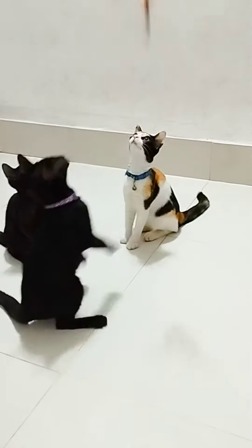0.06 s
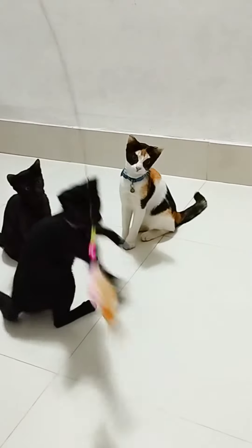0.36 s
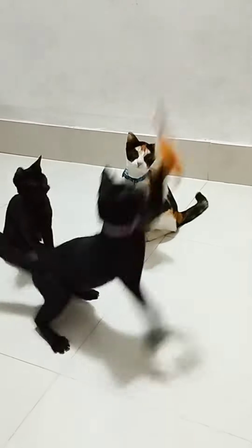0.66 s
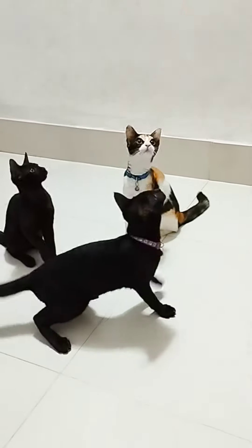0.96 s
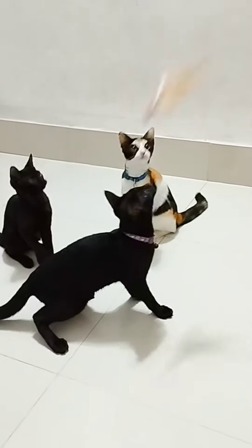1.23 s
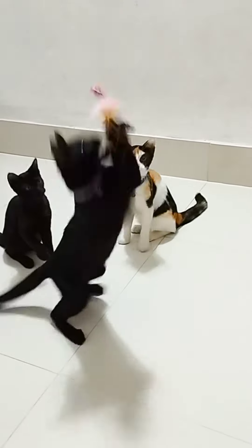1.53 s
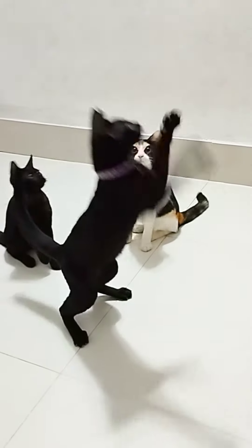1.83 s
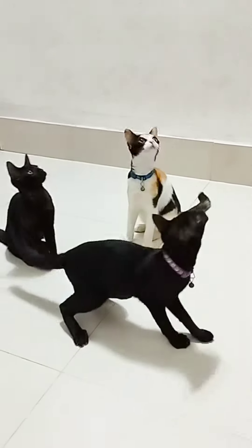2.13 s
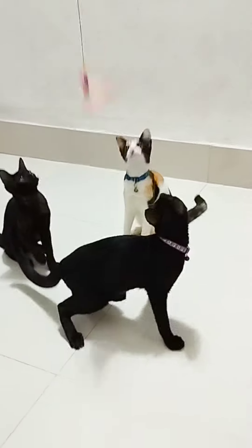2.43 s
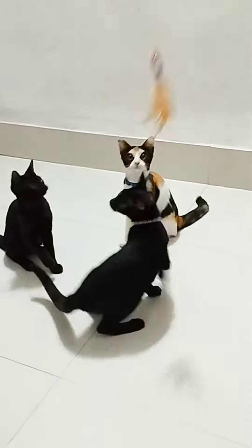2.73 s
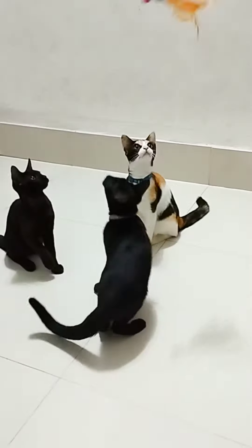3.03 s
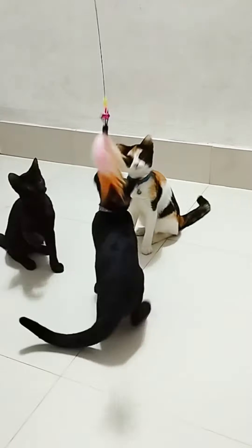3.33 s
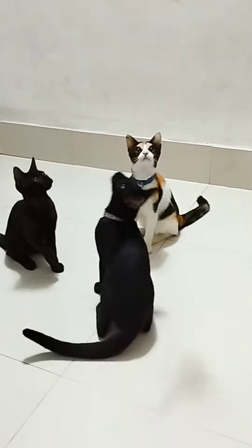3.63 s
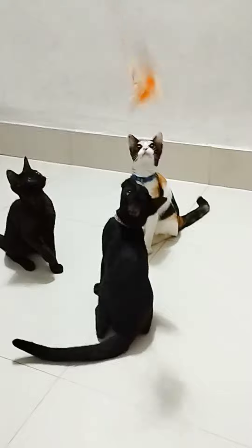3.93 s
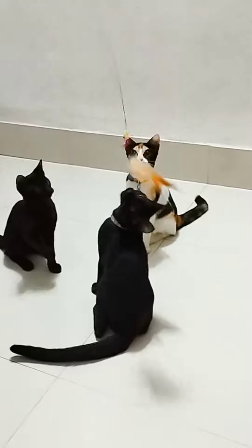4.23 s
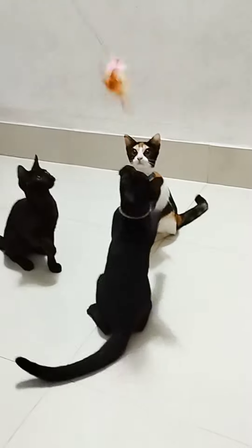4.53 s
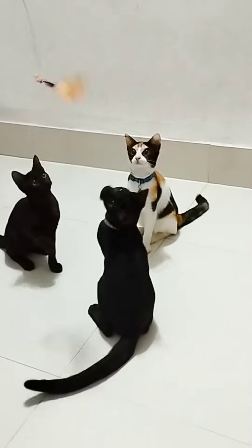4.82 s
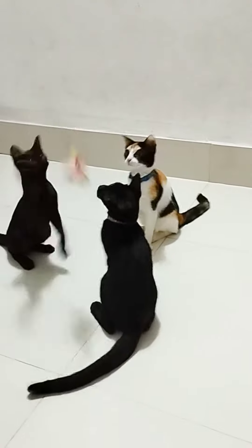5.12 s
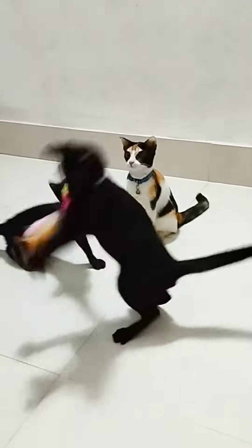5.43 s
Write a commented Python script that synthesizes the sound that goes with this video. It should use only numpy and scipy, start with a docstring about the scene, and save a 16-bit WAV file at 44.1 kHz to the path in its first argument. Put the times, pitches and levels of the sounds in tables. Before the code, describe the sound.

A jerked cat toy's tiny bells clash and rattle indoors, while a collar bell tinkles, paws land softly and a fan hums.

```python
"""Cats chasing a toy with bells

Cats leap and swat at a feather toy on a string in a bare tiled room. The toy's small
bells clash at each jerk and rattle in between; a higher, purer bell tinkles on one cat's
collar. Soft paws thud on the floor. Behind it all a fan hums and stirred air rumbles faintly."""
import sys
import numpy as np
from scipy import signal
from scipy.fft import rfft, irfft, next_fast_len
from scipy.io import wavfile

SR = 44100
rng = np.random.default_rng(int(sys.argv[2]) if len(sys.argv) > 2 else 0)


def transcribe(u):
    """Save the signal u as a 16-bit wav file named by the first command-line argument.

    u: samples, shape (n,) or (channels, n), limited to [-1, 1]; the rate is SR.
    q: integer samples, one column per channel.
    """
    v = np.clip(np.atleast_2d(u).T, -1, 1)
    q = np.round(v * 32767).astype(np.int16)
    wavfile.write(sys.argv[1], SR, q)


N = 249606
TIME = np.arange(N) / SR


def from_db(db):
    """Turns decibels into a gain: -6 dB is about half."""
    return 10 ** (np.asarray(db) / 20)


def rms_one(x):
    """Scales a signal to an average power of 1."""
    return x / np.sqrt(np.mean(x ** 2) + 1e-20)


def at_hz(points, hz):
    """Reads a (frequency, value) curve, with every octave equally wide."""
    known_hz, values = np.transpose(points)
    return np.interp(np.log(hz), np.log(known_hz), values)


def at_time(points, when):
    """Reads a (time, value) curve at the given times."""
    return np.interp(when, *np.transpose(points))


def drift(rate, step=100):
    """A smooth random wobble of size about 1; a higher rate makes it quicker."""
    pole = np.exp(-2 * np.pi * step * rate / SR)
    noise = rng.standard_normal(N // step + 1002)
    slow = signal.lfilter([1], [1, -2 * pole, pole * pole], noise)[1000:]   # skip the settling
    return np.interp(np.arange(N) / step, np.arange(len(slow)), rms_one(slow))


def band(x, low_hz, high_hz):
    """Keeps the sound between two frequencies."""
    return signal.sosfilt(signal.butter(2, [low_hz, high_hz], "band", fs=SR, output="sos"), x)


def coloured(x, spectrum):
    """Boosts or cuts each frequency by a (frequency [Hz], gain [dB]) curve."""
    size = next_fast_len(N)
    hz = np.maximum(np.fft.rfftfreq(size, 1 / SR), 1)
    return irfft(rfft(x, size) * from_db(at_hz(spectrum, hz)), size)[..., :N]


def panned(pan_db):
    """Left and right gains; pan is how much louder the left side is."""
    return from_db(np.array([pan_db, -pan_db]) / 2)


def ring(when, strengths, hz, t60):
    """Blows set one tone ringing; t60, the ring time, is the seconds it takes to fade by 60 dB."""
    clicks = np.full((2, N), 1e-18)
    clicks[:, np.clip((when * SR).astype(int), 0, N - 1)] = strengths
    decay, angle = from_db(-60 / (t60 * SR)), 2 * np.pi * hz / SR
    return signal.lfilter([0, np.sin(angle)], [1, -2 * decay * np.cos(angle), decay ** 2], clicks)


def tumbling(count, spread):
    """A turning bell sends a tone to each side with a new strength at every blow."""
    draws = rng.standard_normal((count, 3)).T
    return np.sign(draws[0]) * (1 + spread * draws[1:]) / np.hypot(1, spread)


def struck(when, strengths, tones, spread):
    """Blows on a turning bell ring all of its tones at once."""
    return sum(ring(when, from_db(db) * strengths * tumbling(len(when), spread), hz, t60)
               for hz, db, t60 in tones)


def rebounds(blows, gap_s, first_db, step_db, count):
    """More blows follow each (time [s], level [dB], ...) at uneven gaps, fading or growing by a step."""
    blows = np.array(blows)
    after = np.repeat(blows[:, None], count, axis=1)
    after[:, :, 0] += np.cumsum(gap_s * (.5 + rng.random((len(blows), count))), axis=1)
    after[:, :, 1] += np.reshape(first_db, (-1, 1)) + step_db * np.arange(count)
    return after.reshape(-1, blows.shape[1])


def flare(when, strengths, t60, rise_s):
    """The loudness of many contacts: each rises fast and dies away, and their energies add."""
    starts = np.clip((when * SR).astype(int), 0, N - 1)
    energy = np.array([np.bincount(starts, side ** 2, N) for side in strengths])
    fall, rise = from_db(-120 / (t60 * SR)), np.exp(-1 / (rise_s * SR))
    smoothed = signal.lfilter([1 - rise], np.convolve([1, -fall], [1, -rise]), energy + 1e-18)
    return np.sqrt(np.abs(smoothed))


def clash(when, strengths, t60, rise_s):
    """Each contact wakes so many brief tones that they sound like a burst of noise."""
    return flare(when, strengths, t60, rise_s) * rng.standard_normal((2, N))


def room(x, gap_s=0.0003, build_s=0.00021):
    """Echoes from tiles and plaster thicken, then fade."""
    # how long the room rings: (frequency [Hz], ring time [s])
    ring_times = [(200, 0.22), (3500, 0.28), (7000, 0.51), (11000, 0.25), (16000, 0.37)]
    t = TIME[:SR * 3 // 4]
    edges_hz = np.geomspace(100, 19000, 11)
    noise = rng.standard_normal((2, 2, len(t)))
    tail = 0
    for k, (low, high) in enumerate(zip(edges_hz, edges_hz[1:])):
        t60 = at_hz(ring_times, np.sqrt(low * high))
        tail = tail + band(noise[k % 2], low, high) * from_db(-60 * t / t60)
    build_up = 1 - np.exp(-np.maximum(t - gap_s, 0) / build_s)
    tail = rms_one(tail * build_up) / np.sqrt(len(t))
    return signal.fftconvolve(x, tail, axes=1)[:, :N]


def roaming_room(x, move_rate=4.6, spots=4):
    """A moving bell passes from one spot's echo to the next."""
    weights = np.array([drift(move_rate) for _ in range(spots)])
    weights = weights / np.sqrt((weights ** 2).sum(axis=0))
    return sum(room(x * weight) for weight in weights)


def draught(gain_db=-11, still_db=-54):
    """Stirred air gives a faint, very deep rumble that swells and sinks with each gust."""
    # gusts of air: (time of peak [s], length [s], relative level [dB])
    gusts = [(0.673, 0.65, -25), (4.946, 0.34, -24.5)]
    swells = sum(from_db(db) * np.exp(-8 * ((TIME - s) / length) ** 2) for s, length, db in gusts)
    rumble = rms_one(band(rng.standard_normal((2, N)), 7.8, 20.3))
    return from_db(gain_db) * (from_db(still_db) + swells) * rumble


def motor_hum(waver_db=3.5, wander_rad=0.94, throb_offset_db=42):
    """The fan motor's tones waver; the deepest ones swell and sink together."""
    # the motor's tones: (frequency [Hz], base level [dB])
    tones = [(49.8, -47), (61, -57), (123.5, -56.5), (204.5, -49.5), (305, -54), (797, -74.5)]
    # throb of the deepest tones: (time [s], relative level [dB])
    throb = [(0, -38), (0.25, -53), (0.5, -38), (1.25, -42.5), (2.05, -37.5), (2.3, -43), (2.55, -35),
             (3.9, -43.5), (4.7, -33), (5.14, -46.5), (5.5, -34)]
    throb_db = at_time(throb, TIME) + throb_offset_db
    out = 0
    for hz, db in tones:
        change_db = throb_db if hz < 100 else waver_db * drift(2)
        phase = 2 * np.pi * hz * TIME + wander_rad * drift(1.25)
        out = out + from_db(db + change_db) * np.sqrt(2) * np.sin(phase)
    return out


def fan_rush(level_db=-36, lag_s=0.00029):
    """A steady rush of air reaches the left side first; its treble comes from all around."""
    # tone colour of the rush: (frequency [Hz], gain [dB])
    spectrum = [(20, -7), (42, -22), (60, -1), (85, -11), (165, -10.5), (245, -2), (325, 0.35), (400, -2.5),
                (530, -8.5), (680, -15), (900, -12.5), (1150, -19.5), (2500, -28.5), (16000, -53)]
    # how alike the two sides are: (frequency [Hz], shared part of the power [0 to 1])
    likeness = [(25, 0.95), (100, 0.54), (170, 1), (330, 0.98), (520, 0.35), (900, 0.54), (1500, 0.042),
                (2500, 0.044), (16000, 0.092)]
    # slow swell of the rush: (time [s], gain [dB])
    swell = [(0, 0), (1.3, -0.4), (2.0, 0), (3.3, -0.3), (4.2, 0), (5.66, 0)]
    hz, alike = np.transpose(likeness)
    direct = coloured(rng.standard_normal(N), np.column_stack([hz, 10 * np.log10(alike)]))
    around = coloured(rng.standard_normal((2, N)), np.column_stack([hz, 10 * np.log10(1 - alike)]))
    delayed = np.interp(TIME - lag_s, TIME, direct)
    rush = rms_one(coloured(around + [direct, delayed], spectrum))
    return from_db(level_db + at_time(swell, TIME)) * rush * panned(pan_db=-1)[:, None]


def paws(room_db=-8):
    """Soft pads land on the floor with a short, dull thud."""
    # paws landing: (time [s], level [dB])
    landings = [(1.536, -32.5), (1.754, -28.5), (1.775, -28), (3.006, -31.5), (4.013, -30), (4.208, -29.5),
                (5.613, -28.5)]
    # tones of a thud: (frequency [Hz], gain [dB], ring time [s])
    tones = [(206, -3, 0.079), (300, 3, 0.069), (362, 1, 0.012)]
    when, level_db = np.transpose(landings)
    thuds = sum(ring(when, from_db(level_db + db), hz, t60) for hz, db, t60 in tones)
    thuds = band(thuds, 196, 450)
    return thuds + from_db(room_db) * room(thuds)


def collar_bell(gain_db=1, bite_db=-11, tick_db=-24):
    """A pellet strikes a small shell and bounces on: a faint tick, a brief bite, then close tones."""
    # pellet strikes: (time [s], relative level [dB], pan [dB])
    strikes = [(0.004, -45, -8), (0.112, -34.5, -14), (0.1325, -34, 1), (0.411, -30.5, -6.5),
               (0.4335, -41, -6), (0.458, -44, -10), (0.6395, -25.5, -6), (0.6475, -42, -4),
               (0.795, -37, 2), (0.828, -42, -9), (0.8632, -37, -9), (0.9, -40, -1), (0.9378, -38, -9),
               (1.425, -39.5, -7), (1.4948, -24, -3), (1.5057, -40, -5), (1.5183, -28, -4),
               (1.5437, -30, 2), (1.6601, -32, -16), (1.7772, -30.5, -4), (1.856, -30, -4),
               (2.9377, -48, -3), (4.683, -36.5, -11), (5.105, -45.5, -11), (5.27, -39.5, -6),
               (5.362, -40, -2), (5.3735, -33, 6), (5.383, -37, -3), (5.4015, -37, -14), (5.415, -34, -3),
               (5.6421, -38.5, -4)]
    # the bell's tones, damped by fur: (frequency [Hz], gain [dB], ring time [s])
    tones = [(6860, -1, 0.015), (7065, -3, 0.027), (7196, -2.5, 0.03), (7110, -11, 0.13)]
    bounces = rebounds(strikes, gap_s=0.043, first_db=-25, step_db=6, count=3)   # soft, but growing
    when, level_db, pan_db = np.vstack([strikes, bounces]).T
    blows = from_db(level_db + gain_db) * panned(pan_db)
    tick = band(clash(when, blows * from_db(tick_db), t60=0.01, rise_s=0.0002), 4000, 16000)
    hiss = rms_one(band(rng.standard_normal((2, N)), 6850, 7400))
    bite = hiss * flare(when, blows * from_db(bite_db), t60=0.025, rise_s=0.00024)
    bell = tick + band(bite + struck(when, blows, tones, spread=0.34), 5600, 7600)
    return bell + roaming_room(bell)


def toy_contacts(count=500, rattle_db=-2.5, scatter_db=4.5, jerk_db=-1, lead_s=0.0038, lead_db=-11):
    """Lists every contact: the bells knock and rebound, and their pellets rattle loosely."""
    # the bells knock together: (time [s], relative level [dB], low clash gain [dB], pan [dB],
    # first rebound gain [dB], ringing gain [dB])
    jerks = [(0.006, -43, -7, 5, 3, -7), (0.0464, -36, -11, 9, 1.5, -7), (0.1957, -38, -19, 10, -18, -10),
             (0.24, -36, -27, 5, -19, -4), (0.5004, -20.5, -9.5, 6.5, -4.5, -1.5),
             (0.546, -30, -12, 6, -2, -6), (0.7108, -31, -16, 8, -9, -1), (0.7514, -36, -4, 9, -1, -4),
             (0.866, -32, -10, 8, -19, -4), (1.0146, -39, -10.5, 8, -0.5, -6), (1.162, -32, -15, 9, -9, -5),
             (1.253, -38, -14, 8, -13, 3), (1.556, -33, -15, 10, -12, -8),
             (1.5607, -15.5, -9.5, 11, -7, -7), (1.6621, -33, -21, 10, -8, -2),
             (1.6826, -21, 2.5, 8, -10.5, -4), (1.6883, -21, -8, 12.5, 1.5, -4.5),
             (1.715, -26, -11, 10, -3, -10), (1.811, -26, -7, 9, -4, -12), (1.874, -28.5, -18, 8, -4, 0),
             (1.9727, -30.5, -14, 9, -9, 0), (2.0082, -31, -12.5, 8, -20, -2),
             (2.084, -37, -8.5, 11, -3, 0), (2.096, -33.5, -10, 9, -2, -6), (2.154, -35, -11, 11, -0.5, 2),
             (2.219, -33, -10.5, 7, -2.5, -1), (2.351, -41, -13, 7, -16, -4), (2.6464, -45, -1, 11, -5, -9),
             (2.88, -39, -23, 7, -12, -4), (2.9992, -34, -7.5, 9, -1.5, -1.5),
             (3.0808, -32, -10.5, 7, 1, -1.5), (3.1364, -32.5, -13, 7, -7, -1),
             (3.226, -33.5, -20, 6, -3, 0), (3.295, -30.5, -36, 7, -20, -13),
             (3.497, -32.5, -6.5, 12, -10, -5), (3.5204, -41, 5.5, 3.5, -18, -6),
             (3.613, -39.5, -7, 8, 3.5, 4), (3.654, -29.5, -18, 8, -12, 3), (3.71, -29.5, -11, 8, 2, -1),
             (3.734, -28, -13, 8, -8, -3), (3.754, -19.5, -2, 17, -24, -17),
             (3.761, -20.5, -22, 15, -18, -18), (3.797, -23, -8, 7, -10, -6),
             (3.8273, -24, -4.5, 23, -4, -17), (3.844, -25, -4.5, 5, -14, -15),
             (3.8663, -24, 3, 9, -11, -16), (3.885, -23.5, -21, 15, -23, -17),
             (3.9477, -30.5, -2, 14, -12, -11), (3.97, -27, -11, 9, -17, -11),
             (3.9898, -26, -7.5, 9.5, -10, -13), (4.062, -30, -28, 7, -12, 0),
             (4.1573, -40, -9, 5, -15, -8), (4.2056, -29.5, -16, 8, -12, -9), (4.2291, -29, -18, 9, -12, 2),
             (4.2464, -25, -4, 10, -10, -6), (4.2834, -26.5, -11, 10, -1, -12),
             (4.324, -24.5, -14, 13, -19, -12), (4.3542, -35.5, 3, 3, -8, -11),
             (4.4445, -28, -12, 10, -18, -12), (4.4635, -27.5, -4.5, 9, -11, -10),
             (4.517, -22, -14.5, 8.5, -4, -6), (4.5983, -24.5, -4, 11, -1, -15),
             (4.6793, -27, -2.5, 12, -2.5, -8), (4.724, -32, -8, 8, -8, -7), (4.738, -31, -18, 9, -13, -8),
             (4.7488, -21.5, -9, 13, -18, -12), (4.7897, -27, 1, 9, -9, 2), (4.882, -30, -6, 7, 1.5, -10),
             (4.887, -23.5, -6, 12, -7, -7), (4.9151, -31, -7, 7, -20, -14), (4.994, -30, -7.5, 10, -2, -7),
             (5.052, -31, -10, 6, -8, -7), (5.147, -31, -10, 5, -7, 3), (5.234, -38, -20, 6, -18, -10),
             (5.356, -42, -5, 3, 2, -6), (5.424, -30.5, -11, 7, -11, 0), (5.4465, -32.5, 2, 3, -6, -9),
             (5.5141, -17.5, -9.5, 7, -25, -3), (5.5295, -14, -31, 4, -11, -6)]
    # how hard the swinging toy rattles: (time [s], relative level [dB])
    swing = [(0, -40), (0.42, -66), (0.78, -49.5), (1.25, -54), (1.42, -65), (1.68, -34), (1.93, -45),
             (2.22, -44), (2.44, -51.5), (2.94, -59), (3.03, -50), (3.36, -42.5), (3.58, -41), (3.85, -46),
             (4.16, -52), (4.27, -35), (4.41, -41), (4.8, -34), (5.33, -53), (5.46, -30), (5.66, -62)]
    when = (np.arange(count) + rng.random(count)) / count * N / SR
    chance_db = scatter_db * np.clip(rng.standard_normal(count), -2, 2)
    level_db = at_time(swing, when) + rattle_db + chance_db
    low_pan_ring_db = np.tile([-10, 9, -6], (count, 1))   # the same for all loose rattling
    rattle = np.column_stack([when, level_db, low_pan_ring_db])
    knock_s, knock_db, low_db, pan_db, first_db, ring_db = np.transpose(jerks)
    knocks = np.column_stack([knock_s, knock_db + jerk_db, low_db, pan_db, ring_db])
    lead_ins = knocks + [-lead_s, lead_db, 0, 0, 0]   # a faint lead-in softens the start of each knock
    bounces = rebounds(knocks, gap_s=0.012, first_db=first_db, step_db=-4, count=5)
    return np.vstack([rattle, knocks, lead_ins, bounces]).T


def clinks(when, strengths, low_hz, high_hz, t60, count=3):
    """Each contact rings a few single tones, whose pitch depends on where it happens to land."""
    t = TIME[:SR // 36]
    draws = rng.random((len(when), count, 3, 1))   # pitch, left phase, right phase
    hz = low_hz + (high_hz - low_hz) * draws[:, :, 0]
    samples = (np.maximum(when, 0) * SR).astype(int)[:, None] + np.arange(len(t))
    out = []
    for side in (0, 1):
        tones = np.sin(2 * np.pi * (hz * t + draws[:, :, 1 + side])).sum(axis=1)
        fading = strengths[side][:, None] * tones * from_db(-60 * t / t60)
        out.append(np.bincount(samples.ravel(), fading.ravel(), N)[:N])
    return np.array(out)


def mistuned_bells(when, strengths, count=4, mistune_percent=0.76):
    """Each contact rings the high tones of one of a few bells of slightly different size."""
    # high tones of a toy bell: (frequency [Hz], gain [dB], ring time [s])
    tones = [(9130, -19, 0.091), (9500, -19.5, 0.047), (10410, -8.5, 0.081), (11140, -15, 0.055),
             (12450, -14, 0.05), (13160, -21, 0.044)]
    bell_hit = rng.integers(0, count, len(when))
    tunings = 1 + np.linspace(-1, 1, count) * mistune_percent / 100
    out = 0
    for bell, tuning in enumerate(tunings):
        hits = bell_hit == bell
        out = out + struck(when[hits], strengths[:, hits], np.array(tones) * [tuning, 1, 1], spread=0.75)
    return out


def toy_rattle(top_db=-1.9, top_clink_db=-22, low_db=2, low_clink_db=-16, ring_db=-2, shell_db=-14):
    """Bells and pellets clash, clink and set the metal shells ringing."""
    # tone colour of shell hitting shell: (frequency [Hz], gain [dB])
    clash_spectrum = [(1500, -7), (2500, -5.5), (3050, 2), (4000, -2.5), (4650, 2), (5300, 2.5),
                      (6400, 7.5), (7450, 6), (8200, 8.5), (9100, 11), (11000, 7), (12400, 6.5),
                      (14000, 9.5), (16000, 21)]
    # lower tones of the shells: (frequency [Hz], gain [dB], ring time [s])
    shell_tones = [(2930, -21, 0.03), (3650, -9.5, 0.094), (3636, -7.5, 0.055), (5040, -11, 0.046),
                   (5130, 0, 0.045), (5310, -9, 0.04), (6210, -13, 0.055), (6300, -7, 0.06),
                   (6900, -8, 0.05)]
    when, level_db, lower_db, pan_db, ringing_db = toy_contacts()
    bright = from_db(level_db) * panned(pan_db)   # the high tones beam to one side
    lower = from_db(level_db + lower_db + low_db) * panned(pan_db=-1.5)[:, None]
    top = clash(when, bright * from_db(top_db), t60=0.0052, rise_s=0.00055)
    top += clinks(when, bright * from_db(top_clink_db), 9030, 15800, t60=0.057)
    body = clash(when, lower, t60=0.011, rise_s=0.00055)
    body += clinks(when, lower * from_db(low_clink_db), 2960, 7400, t60=0.07)
    clashes = coloured(band(top, 10950, 13660) + band(body, 2430, 8640), clash_spectrum)
    high_ring = mistuned_bells(when, bright * from_db(ring_db + ringing_db))
    low_ring = struck(when, lower * from_db(shell_db), shell_tones, spread=1.0)
    return clashes + high_ring + low_ring


def shell_tone(hz, t60, twin_gap_hz=53.5, twin_db=-10.5, buzz_hz=7.3, damped_db=-1, damped_t60=0.061):
    """The shell's slit splits a tone into a beating pair, and the buzzing pellet roughens it."""
    t = TIME[:SR // 4]
    side_phase = np.array([[0], [np.pi / 2]])
    phase, twin_phase = 2 * np.pi * rng.random((2, 1, 1)) + side_phase
    buzz = np.cumsum(rng.standard_normal(len(t))) * np.sqrt(2 * np.pi * buzz_hz / SR)
    angle = 2 * np.pi * hz * t + buzz
    twin = from_db(twin_db) * np.sin(angle + 2 * np.pi * twin_gap_hz * t + twin_phase)
    loud_start = from_db(damped_db - 60 * t / damped_t60)   # soon damped by pellet and other bells
    return (np.sin(angle + phase) + twin) * (from_db(-60 * t / t60) + loud_start)


def toy_pings(gain_db=-5, pan_db=-3, lower_ratio=0.712, third_ratio=1.255, third_db=-8):
    """A head-on pellet strike rings a whole shell: a main tone, a lower one and a brief higher one."""
    # head-on strikes: (time [s], main tone [Hz], relative level [dB], lower tone gain [dB],
    # main tone's ring time [s])
    pings = [(0.514, 5060, -48, 7, 0.08), (0.5514, 5100, -39, -9, 0.16), (0.7502, 5080, -43, -7, 0.06),
             (1.5643, 5060, -32, -7, 0.082), (1.6811, 5120, -27.5, -1.5, 0.08),
             (1.734, 5060, -45, -1, 0.05), (1.7464, 5040, -28, -18, 0.051), (1.8233, 5120, -30, -16, 0.056),
             (2.1959, 5150, -45, -12, 0.08), (2.641, 5105, -59, 12.5, 0.06), (3.018, 5087, -52, -8, 0.08),
             (3.1009, 5050, -46, -7, 0.07), (3.122, 5130, -44, -14, 0.076), (3.48, 5100, -51, 3, 0.06),
             (3.5204, 5030, -31, -9.5, 0.021), (3.597, 5080, -59, 8, 0.06),
             (3.7544, 5100, -24.5, -30, 0.028), (4.0786, 5110, -38, -17, 0.056),
             (4.355, 5130, -43, -14, 0.04), (4.472, 5060, -43.5, 7, 0.053), (4.5685, 5077, -31, -7, 0.08),
             (4.6039, 5085, -40, -3, 0.08), (4.7905, 5130, -25.5, -31, 0.039),
             (4.9957, 5010, -39, -8, 0.053), (5.4454, 5040, -49, 11, 0.06), (5.5184, 5130, -36.5, -1, 0.08),
             (5.54, 5093, -31, -12, 0.15)]
    out = np.zeros((2, N + SR))
    for s, hz, level_db, lower_db, t60 in pings:
        tones = shell_tone(hz, t60)
        tones += from_db(lower_db) * shell_tone(hz * lower_ratio, t60=0.19)
        tones += from_db(third_db) * shell_tone(hz * third_ratio, t60=0.025)
        start = int(s * SR)
        out[:, start:start + tones.shape[1]] += from_db(level_db + gain_db) * tones
    return out[:, :N] * panned(pan_db)[:, None]


def toy_bells(rattle_room_db=1, ping_room_db=-2):
    """The toy's bunch of bells and its echo; such tiny shells give off no bass."""
    rattle = band(toy_rattle(), 1540, 17100)
    pings = band(toy_pings(), 1900, 17400)
    echo = roaming_room(from_db(rattle_room_db) * rattle + from_db(ping_room_db) * pings)
    return rattle + pings + echo


def scene():
    """Bells and paws over the fan and the stirred air."""
    return toy_bells() + collar_bell() + paws() + fan_rush() + motor_hum() + draught()


def record(dry, dip_hz=8270, dip_depth=0.79, cutoff_hz=15750):
    """The microphone has a dip in the treble, and the very top is cut off."""
    dip_band = signal.lfilter(*signal.iirpeak(dip_hz, Q=5.1, fs=SR), dry)
    low_pass = signal.ellip(10, .2, 70, cutoff_hz, fs=SR, output="sos")
    return signal.sosfilt(low_pass, dry - dip_depth * dip_band)


dry = scene()
out = record(dry)
transcribe(out)
```